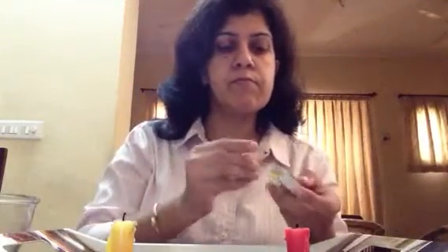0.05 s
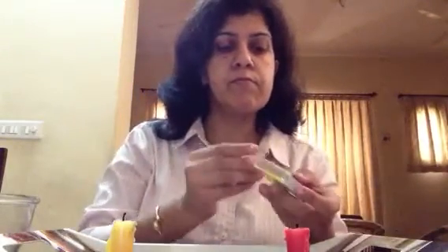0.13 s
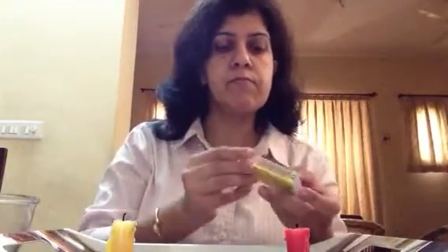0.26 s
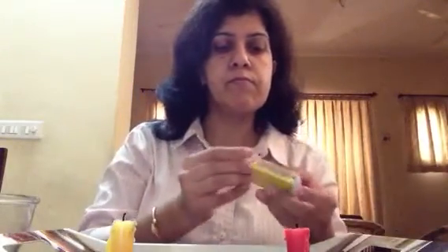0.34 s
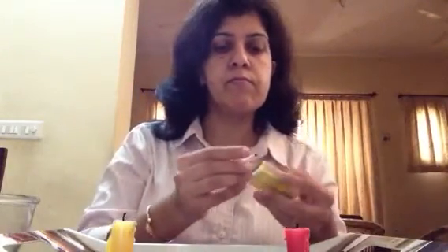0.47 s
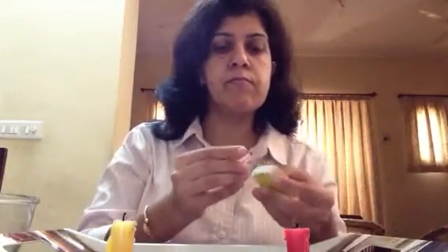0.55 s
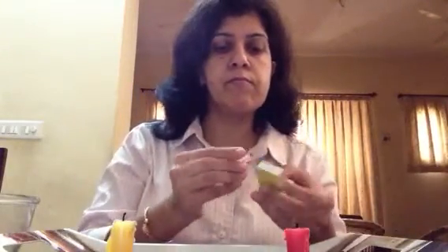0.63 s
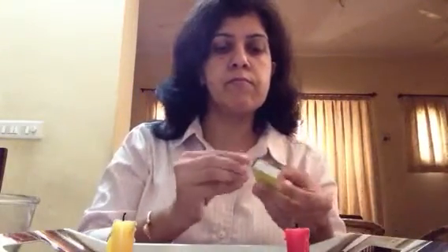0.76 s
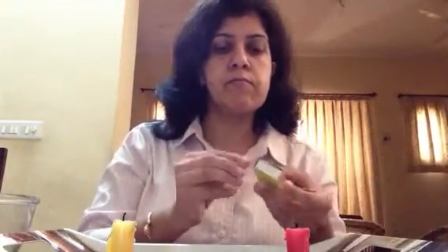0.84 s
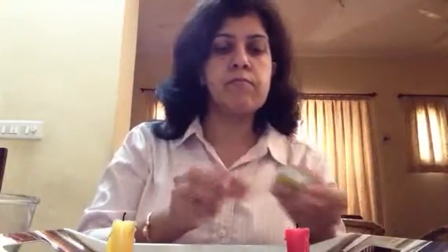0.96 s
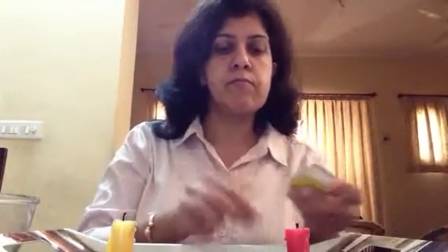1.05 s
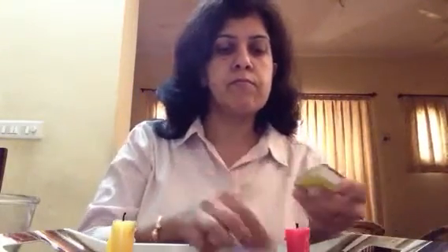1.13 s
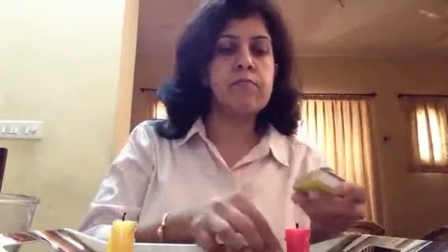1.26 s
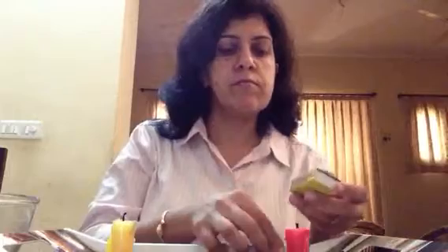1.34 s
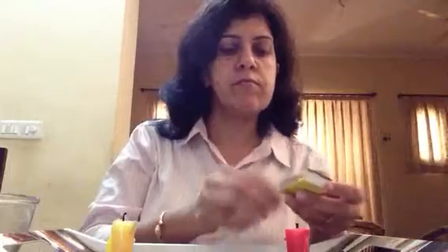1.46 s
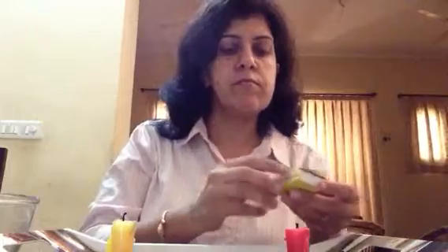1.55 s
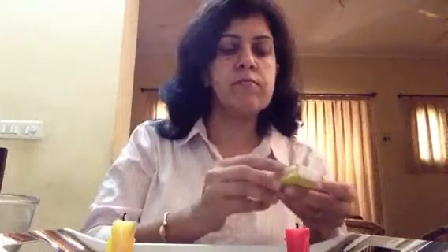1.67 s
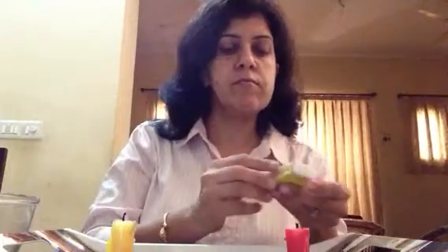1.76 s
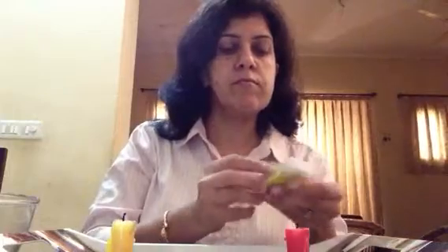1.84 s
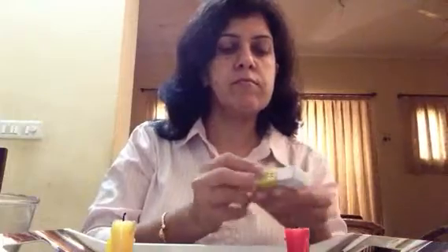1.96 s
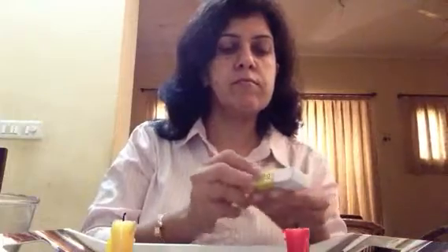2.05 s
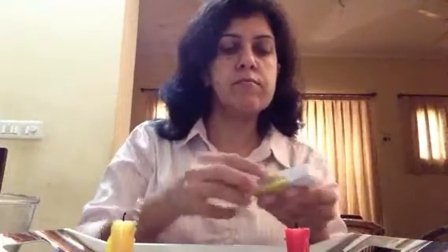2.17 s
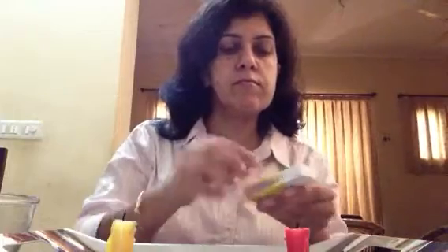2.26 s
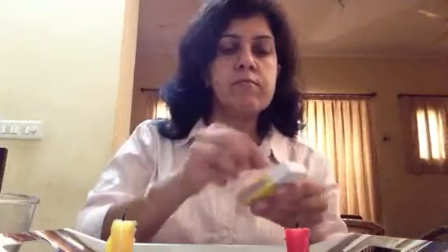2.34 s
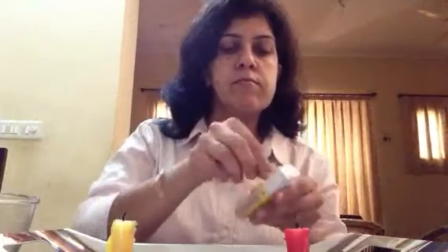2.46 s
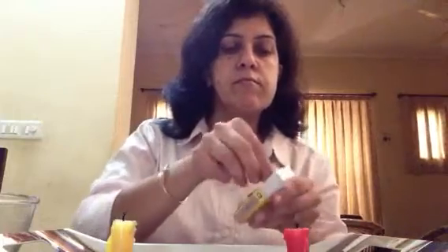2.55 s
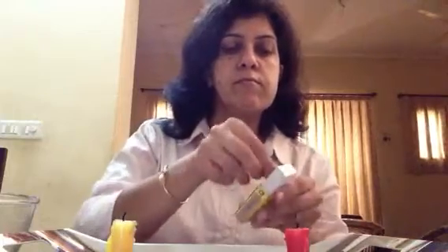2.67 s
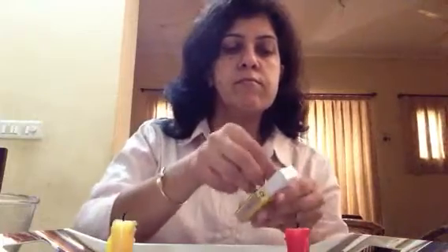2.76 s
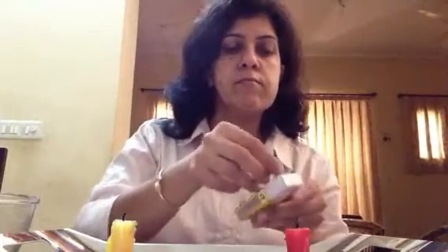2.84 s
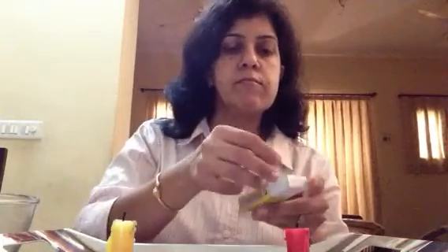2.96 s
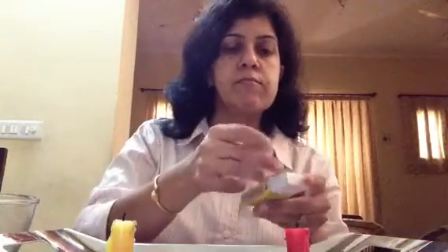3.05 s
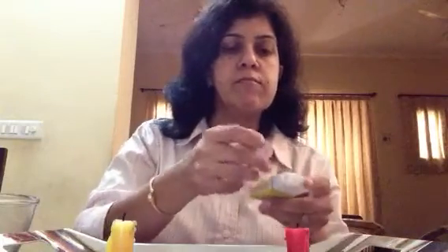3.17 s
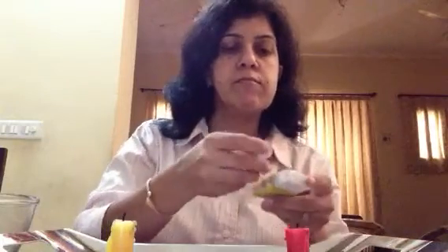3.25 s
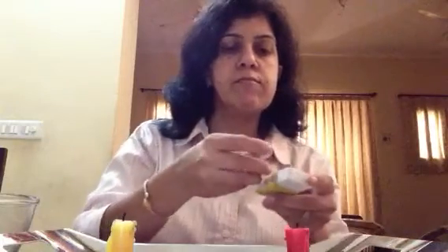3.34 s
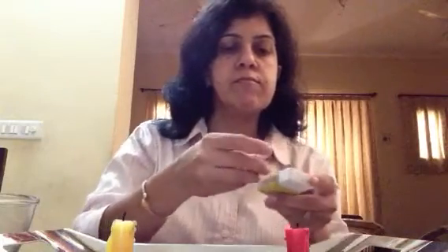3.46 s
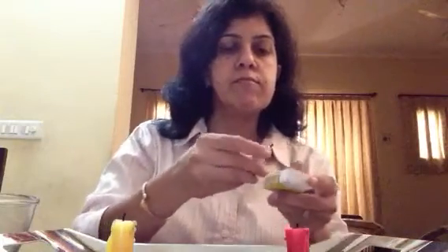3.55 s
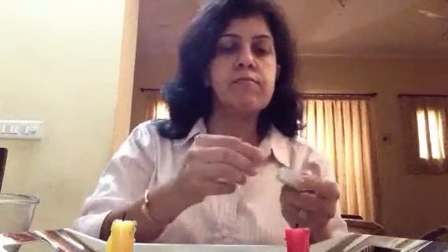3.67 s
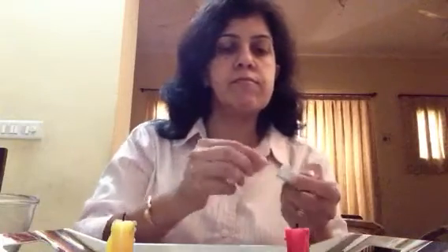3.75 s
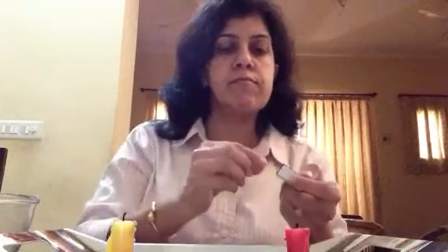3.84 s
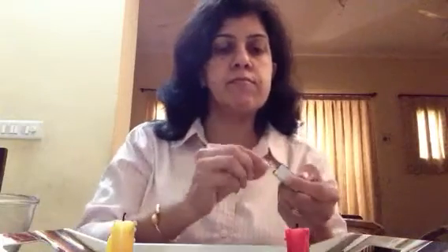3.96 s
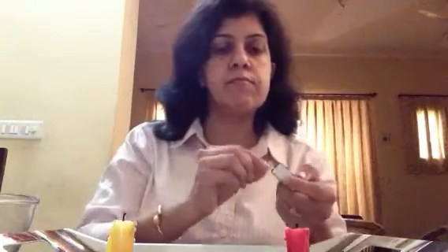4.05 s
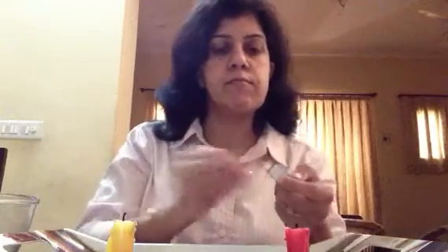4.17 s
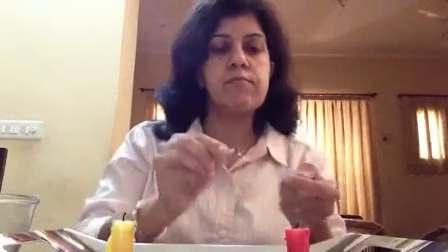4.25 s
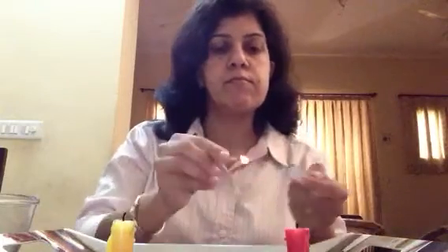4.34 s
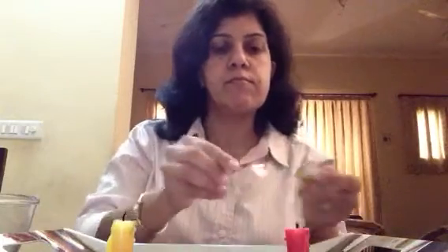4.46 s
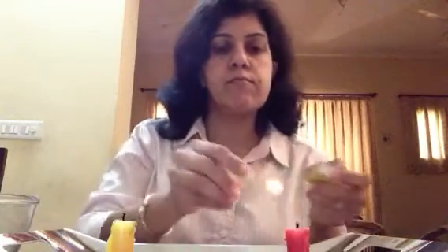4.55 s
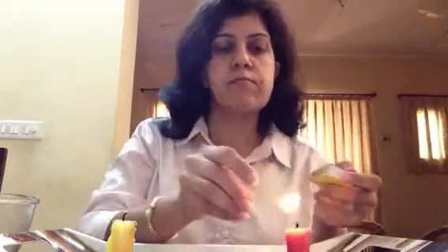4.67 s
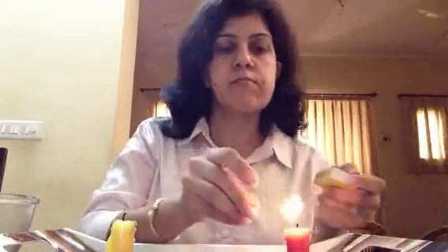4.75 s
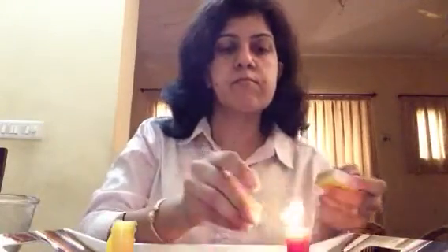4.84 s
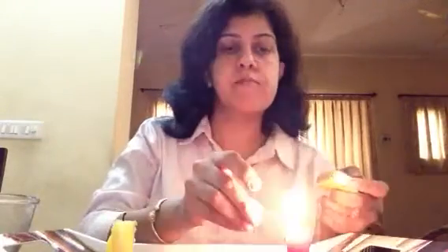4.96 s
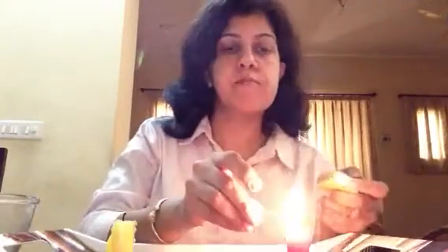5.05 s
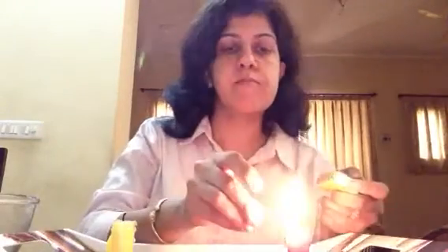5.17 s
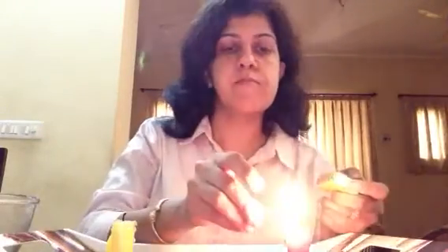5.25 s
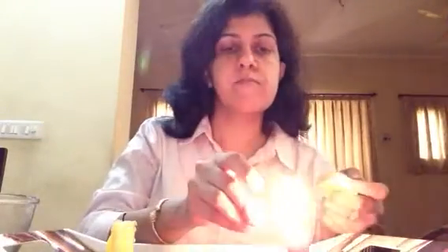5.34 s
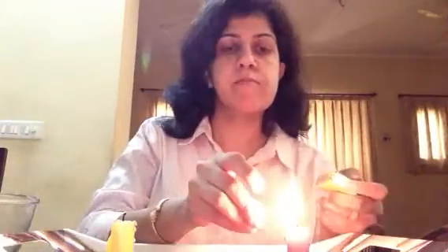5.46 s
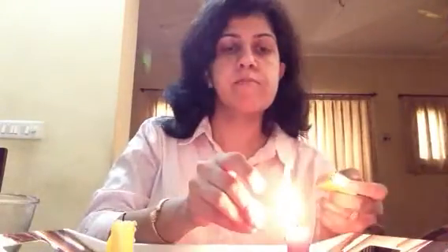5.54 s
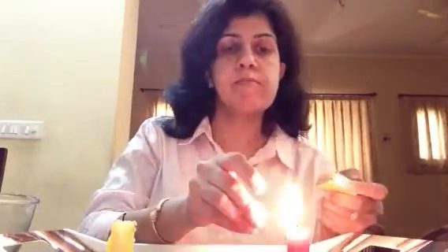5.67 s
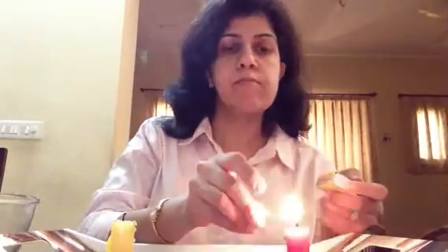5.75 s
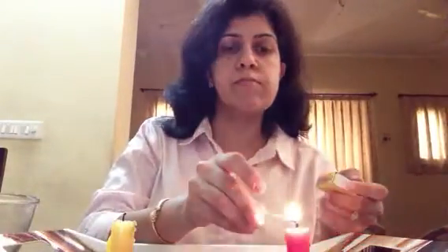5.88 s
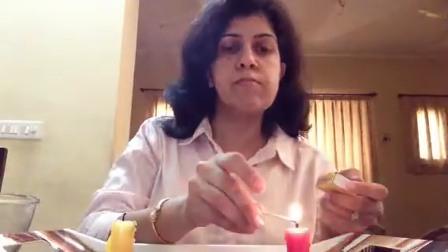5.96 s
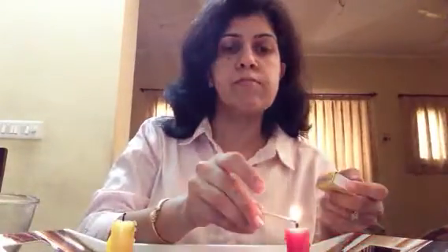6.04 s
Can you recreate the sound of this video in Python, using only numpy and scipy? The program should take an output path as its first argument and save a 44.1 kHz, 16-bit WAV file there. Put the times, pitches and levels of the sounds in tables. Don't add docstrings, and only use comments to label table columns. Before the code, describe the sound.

A washing machine in the next room swishes water to and fro beneath faint hush. Nearby, a matchbox is handled: papery scrapes, tiny hollow taps, bright snapping clicks. Then comes a tight burst of sharp cracks, a rough puff of gas, dull pops and an uneven hiss that weakens into dry spitting. A faint horn dips early on. Lightly echoing house room, small device with the highest treble cut.

```python
import sys
import numpy as np
from scipy import signal
from scipy.fft import rfft, irfft
from scipy.io import wavfile
from scipy.ndimage import uniform_filter1d

SR = 44100
rng = np.random.default_rng(int(sys.argv[2]) if len(sys.argv) > 2 else 0)


def generate_wav(sig):
    pcm = np.round(np.clip(np.atleast_2d(sig).T, -1, 1) * 32767).astype(np.int16)
    wavfile.write(sys.argv[1], SR, pcm)


def amplitude_ratio(level_db):
    exponent = np.asarray(level_db, float) / 20
    return 10 ** exponent


N = 269362
T = np.arange(N) / SR
STEPS = T[::32]

# f/Hz, width/Hz, level/dB
BOX_RINGS = [(1275, 101, -3.5), (1840, 450, 1.5), (2533, 410, -4)]
# t/s, gas level/dB
BURNING = [
    (4.2, -51),
    (4.27, -54.5),
    (4.39, -63),
    (4.56, -63),
    (4.64, -56),
    (4.82, -56.5),
    (5.2, -58),
    (5.48, -58.5),
    (5.66, -76),
]
# f/Hz, level/dB (per Hz)
GAS_HISS_COLOUR = [(2060, -32.5), (3500, -12), (6320, -7), (7160, -3), (7770, -6), (9840, -2),
                   (10700, -3.5), (14500, -1.5), (15500, -7)]


def level(x, db):
    return x * amplitude_ratio(db) / np.sqrt(np.mean(x ** 2))


def peak(x, db):
    return x * amplitude_ratio(db) / np.abs(x).max()


def band(x, hz, width_hz):
    return signal.lfilter(*signal.iirpeak(min(hz, 18000), hz / width_hz, fs=SR), x)


def coloured(x, points):
    hz, db = np.transpose(points)
    f = np.maximum(np.arange(N // 2 + 1) * SR / N, 1)
    gain = amplitude_ratio(np.interp(np.log(f), np.log(hz), db))
    return level(irfft(rfft(x) * gain, N), 0)


def noise():
    return rng.standard_normal(N)


def grit(spread_db):
    return noise() * amplitude_ratio(spread_db * np.minimum(rng.exponential(size=N), 4))


def walk(rate):
    hold = int(SR / rate)
    held = np.repeat(rng.standard_normal(N // hold + 1), hold)
    return 1.24 * uniform_filter1d(uniform_filter1d(held, hold), hold)[:N]


def curve(rows, column):
    rows = np.array(rows)
    gain = np.zeros(N)
    on = slice(int(rows[0, 0] * SR), int(rows[-1, 0] * SR))
    gain[on] = amplitude_ratio(np.interp(T[on], rows[:, 0], rows[:, column]))
    return uniform_filter1d(gain, size=200)


def swells(rows, column):
    power = 0
    for row in rows:
        rise_share = 0.86
        away = np.maximum((row[0] - STEPS) / rise_share, STEPS - row[0])
        power = power + amplitude_ratio(row[column] - 20 * away / max(row[-1], .005)) ** 2
    return np.interp(T, STEPS, np.sqrt(power))


def burst(ms, grains, rise=0.2):
    t_ms = np.arange(len(grains)) / SR * 1000
    ms = max(ms, .3)
    return grains * np.minimum(t_ms / (rise * ms), 1) * np.exp(-t_ms / ms)


def add(out, s, x):
    i = int(s * SR)
    out[i:i + len(x)] += x[:N - i]


def slosh():
    # crest t/s, level/dB, time to rise 20 dB/s, time until it settles/s
    swings = [
        (0.35, -48, 0.09, 0.3),
        (0.596, -53, .2, .12),
        (1.203, -47.5, 0.1, .4),
        (1.663, -58.5, -0.4, 0.024),
        (2.07, -48.5, 0.22, 0.56),
        (2.862, -48.5, 0.12, 0.46),
        (3.743, -50.5, 0.26, 0.58),
        (4.65, -50.5, 0.43, 0.53),
        (5.43, -46, 0.2, 0.12),
        (5.72, -54, .3, .08),
    ]
    surges = []
    for s, top_db, rise, length in swings:
        before, after = np.maximum(s - STEPS, 0), np.maximum(STEPS - s, 0)
        settling = np.maximum(STEPS - s - length, 0)
        surges.append(top_db - 20 / max(rise, .02) * before - 26.5 * after - 51 * settling)
    still_db = -67
    return np.interp(T, STEPS, amplitude_ratio(np.maximum(np.max(surges, axis=0), still_db)))


def washer():
    # f/Hz, level/dB (per Hz)
    slosh_colour = [(41, -62.5), (70, -32), (140, -7), (173, -6), (298, -1.5), (407, -6), (438, 1.5),
                    (493, -8), (827, -9), (1030, -13.5), (2400, -27.5), (3120, -56.5), (5280, -120)]
    # f/Hz, width/Hz, level/dB
    tub_rings = [(229.9, 23, -6), (303.8, 32, -4), (390.9, 11, -5), (435.4, 10, -6), (552, 14.9, -24.5),
                 (687.6, 35, -13), (822, 19, -14), (942, 34, -15.5)]
    # t/s, level/dB, rise/s, decay/s
    sprays = [
        (.27, -57.5, 0.28, 0.19),
        (1.14, -58.5, 0.014, 0.33),
        (1.97, -55.5, 0.019, 0.2),
        (2.79, -59, 0.045, 0.3),
        (3.62, -62, 0.11, 0.35),
        (4.52, -77, .05, 0.16),
        (5.36, -64, 0.037, 0.17),
    ]
    # f/Hz, level/dB (per Hz)
    spray_colour = [(1060, -32.5), (1800, -4.5), (2720, -4.5), (3150, -3), (4810, -7.5), (8250, -9.5),
                    (14400, -23), (15500, -20)]
    water = coloured(noise(), slosh_colour)
    for hz, width_hz, db in tub_rings:
        ring = band(band(noise(), hz, width_hz), hz, 4 * width_hz)
        water = water + amplitude_ratio(db + 2 * walk(6.3)) * level(ring, 0)
    turns = 0
    for s, db, rise, decay in sprays:
        fade = np.exp(-np.maximum(T - s, 0) / decay)
        turns = turns + amplitude_ratio(db) * np.clip((T - s) / rise, 0, 1) * fade
    spray = coloured(grit(spread_db=2.0), spray_colour) * amplitude_ratio(1.65 * walk(25.4))
    return slosh() * level(water, 0) + turns * spray


def motor_whine():
    # multiple of its rate, level/dB
    tones = [(5, -86), (6, -81.5), (7, -87.5), (9, -89.5)]
    motor_hz = 302
    turn = 2 * np.pi * np.cumsum(motor_hz * (1 + 0.00085 * walk(4))) / SR
    return sum(amplitude_ratio(db + 2 * walk(24)) * np.sqrt(2) * np.sin(round(k) * turn) for k, db in tones)


def hush():
    # f/Hz, level/dB (per Hz)
    air_colour = [(12, -77), (20, -36), (74, -37.5), (112, -11.5), (238, -4.5), (352, -5), (439, -24),
                  (505, -15.5), (1160, -23.5), (1820, -25.5), (1980, -21.5), (2150, -28), (15500, -31.5)]
    return amplitude_ratio(-63) * coloured(noise(), air_colour) * amplitude_ratio(.5 * walk(3.08))


def rubbing():
    # firmest t/s, hiss level/dB, box body level/dB, time to fade 20 dB/s
    strokes = [(.08, -82, -70, 0.1), (.134, -81, -78, 1.1), (.258, -62.5, -67, 0.02),
               (.356, -59, -58, 0.13), (.575, -71, -72, 0.15), (.63, -65, -62.5, 0.05),
               (.655, -65, -66, .04), (.685, -66, -61.5, 0.03), (.74, -73, -66, 0), (1.55, -80, -75.5, 2.5),
               (1.69, -68, -75, .04), (1.71, -63, -62, 0.08), (1.726, -61, -65, .04), (1.76, -69, -70, 0.1),
               (1.862, -59.5, -63, 0.02), (1.96, -56.5, -56.5, 0.07), (2.016, -54.5, -56, 0.08),
               (2.165, -62.5, -57.5, 0.12), (1.908, -56, -52, .008), (1.912, -48, -50, .012),
               (1.92, -65, -69, 0.05), (2.461, -55, -61, -0.05), (2.492, -65, -53, 0.05),
               (2.5, -63, -55.5, 0.1), (2.547, -60, -56, 0.05), (2.57, -63, -59.5, .1),
               (2.64, -63, -60, 0.05), (2.7, -69, -56, 0.08), (2.755, -64, -56.5, 0.08),
               (2.839, -60, -58.5, 0.13), (3.055, -67.5, -60, 0.15), (3.123, -58, -64, -0.01),
               (3.18, -62, -58, 0.01), (3.43, -76, -68, 0), (3.62, -59.5, -61, -0.06),
               (3.68, -64, -63.5, 0.13), (3.73, -56.5, -59.5, 0.09), (3.805, -54.5, -53, 0.05),
               (3.85, -63.5, -62.5, .1), (3.93, -68, -64.5, .1), (4.0, -75, -62, -0.04),
               (5.724, -73, -76, 0.43)]
    # f/Hz, level/dB (per Hz)
    rub_colour = [(1760, -32), (3000, -10), (5310, -0.5), (6660, -0.5), (10600, 0.5), (14700, -2.5),
                  (15500, -4.5)]
    grains = grit(spread_db=2.5) * amplitude_ratio(1.7 * walk(140))
    body = level(sum(amplitude_ratio(db) * band(grains, hz, w) for hz, w, db in BOX_RINGS), 0)
    hiss = coloured(grains, rub_colour)
    return swells(strokes, column=1) * hiss + swells(strokes, column=2) * body


def ticks():
    # t/s, crack level/dB, crack f/Hz, body level/dB
    taps = [(0.0737, -60, 9500, -57), (0.1389, -57, 9600, -52.5), (0.185, -66, 5000, -54),
            (0.222, -66, 5000, -54), (0.627, -58, 5300, -59), (0.6697, -56, 4300, -64),
            (0.7086, -51, 7100, -47.5), (0.737, -60, 7040, -55), (1.49, -44.5, 6000, -61),
            (1.5204, -54, 5150, -54), (1.5547, -48, 11600, -49.5), (1.5803, -60, 5300, -64),
            (1.6234, -61.5, 5300, -64.5), (1.865, -53, 7880, -49), (2.5428, -40.5, 7000, -43),
            (2.555, -44, 4600, -55), (2.599, -45, 8500, -59.5), (2.6405, -46, 7800, -66),
            (3.788, -52, 10000, -46), (3.811, -49, 4970, -46), (3.918, -54, 9000, -58),
            (4.003, -55, 5400, -52), (4.0265, -53, 5570, -55), (3.996, -57, 11000, -64)]
    # t/s, crack level/dB, crack f/Hz, body level/dB, body
    # f/Hz
    louder_taps = [(0.682, -60, 6500, -46, 1360), (.688, -57, 5000, -51, 1900), (.612, -64, 5000, -50, 1900),
                   (1.3695, -37, 9510, -47, 1200), (1.3743, -30, 11400, -46, 1970),
                   (1.3756, -33, 6150, -54, 1880), (1.3851, -43, 12000, -70, 1900),
                   (1.4317, -37, 5660, -53, 1200), (1.4344, -29.5, 11800, -48, 1930),
                   (1.9062, -35, 7000, -38, 2480), (1.9105, -39, 7500, -45, 2420), (1.913, -50, 7000, -42, 1820),
                   (1.925, -41, 6900, -33, 2630), (1.9275, -30, 7150, -33, 2620), (1.9308, -30, 9000, -40, 2500),
                   (1.9318, -22, 9500, -38, 2300), (1.9355, -26, 6900, -33, 2450), (1.9395, -39, 5500, -39, 2420),
                   (1.944, -44, 5470, -42, 1920), (2.4657, -32, 6900, -42, 2500), (2.4735, -37, 7800, -36, 2300),
                   (2.4772, -27, 7200, -36, 1770), (2.4787, -27.5, 5300, -38, 1600),
                   (2.4835, -34, 5400, -48, 1590), (2.673, -23.5, 10300, -39, 2780),
                   (2.6762, -19.5, 6800, -33.5, 1850), (2.6805, -36, 7090, -31, 2800),
                   (2.7417, -33, 5300, -43, 2800), (3.0172, -39, 6000, -48, 2620), (3.045, -46, 4200, -45, 2640),
                   (3.052, -49, 4000, -55, 2700), (3.062, -48, 4100, -62, 2700), (3.1775, -48, 4300, -48.5, 2480),
                   (1.7245, -51, 11000, -50, 1620), (.58, -58, 5460, -50, 1850), (4.868, -44, 4300, -35, 1150),
                   (4.873, -48, 3000, -37, 1700), (2.52, -50, 5400, -52, 2700), (2.575, -52, 7500, -52, 2600),
                   (2.695, -48, 6500, -44, 1750), (2.708, -52, 5000, -46, 2800), (3.128, -54, 4500, -58, 2600)]
    out, grains = np.zeros(N), level(grit(spread_db=3.5), 0)
    hits = [(*row, 1840, 3.2) for row in taps] + [(*row, 2.2) for row in louder_taps]
    for s, crack_db, crack_hz, body_db, body_hz, ms in hits:
        rattle = burst(ms, grains[int(s * SR):][:1500])
        hit = rattle + 10 / ms * signal.unit_impulse(1500, idx=30)
        crack = band(band(hit, crack_hz, .3 * crack_hz), crack_hz, .9 * crack_hz)
        crack = crack + .35 * band(band(hit, 7400, 12000), 7400, 12000)
        hollow = sum(amplitude_ratio(db) * band(hit, hz, w) for hz, w, db in BOX_RINGS)
        ring = band(hit, body_hz, .11 * body_hz) + .4 * hollow
        body = band(ring, body_hz, body_hz)
        add(out, s - .0005, peak(crack, crack_db) + peak(body, body_db))
    return out


def horn():
    # t/s, f/Hz, level/dB
    glide = [
        (1.28, 1084, -84.5),
        (1.5, 1060, -73),
        (1.7, 1047, -73),
        (1.88, 1030, -71),
        (1.93, 1045, -82),
    ]
    hz = np.interp(T, *np.transpose(glide)[:2])
    tone = np.sqrt(2) * np.sin(2 * np.pi * np.cumsum(hz) / SR)
    return curve(glide, 2) * amplitude_ratio(1.6 * walk(14.8)) * tone


def knocks():
    # t/s, peak level/dB, treble slope/dB per octave
    taps = [
        (2.4352, -36, 1),
        (2.478, -42, -5),
        (2.677, -41, -5),
        (2.7415, -37, 1),
        (4.8686, -29, 0),
        (4.8716, -30, 0),
        (4.8765, -35, -4),
    ]
    # f/Hz, level/dB, time to fade 60 dB/s
    tones = [(596, -5, .03), (950, -3, .025), (1124, -1, .05), (1354, -2, .03), (2000, -4, .012),
             (2780, -1, .018), (3830, -4, .008), (5060, -3, .01)]
    out, t = np.zeros(N), T[:SR // 10]
    for s, peak_db, slope in taps:
        rings = np.zeros(len(t))
        for hz, db, t60 in tones:
            tone_db = db + slope * np.log2(hz / 1000) + 2 * rng.standard_normal()
            rings += amplitude_ratio(tone_db - 60 * t / t60) * np.sin(2 * np.pi * hz * t)
        add(out, s, peak(rings, peak_db))
    return out


def strike():
    moments = [4.17642, 4.1779, 4.17934, 4.18005, 4.18275, 4.1842]
    # peak level/dB, ring f/Hz, thump level/dB, sign of the pulse
    blasts = [
        (-8, 12500, -19, 1),
        (-16, 13000, -32, 1),
        (.5, 11500, -20, 1),
        (-8, 10500, -30, -1),
        (-9.5, 11000, -26, 1),
        (-16, 12000, -29, -1),
    ]
    # f/Hz, width/Hz, level/dB
    thump_rings = [(300, 111, -14.5), (624, 71, -18), (983, 85, -6), (1263, 18, -12.5), (1370, 50, -9),
                   (2800, 550, -9), (1750, 245, 3), (1480, 990, -7), (4570, 210, -5)]
    out = np.zeros(N)
    for s, (db, hz, thump_db, sign) in zip(moments, blasts):
        chatter = burst(.8, rng.standard_normal(6000))
        hit = sign * signal.unit_impulse(6000) + .14 * chatter
        crack = band(hit, hz, .55 * hz) + .15 * hit
        thump = sum(amplitude_ratio(g_db) * level(band(hit, f_hz, w), 0) for f_hz, w, g_db in thump_rings)
        add(out, s, peak(crack, db) + peak(thump, thump_db))
    return out


def rush():
    # start t/s, level/dB, decay/s
    puff = (4.181, -37, 0.042)
    # f/Hz, level/dB (per Hz)
    puff_colour = [(290, -49.5), (500, -18.5), (754, -20.5), (1300, -3), (1910, -8.5), (2110, -14.5),
                   (2750, -7), (5290, -15), (9000, -14.5), (11700, -40), (19800, -120)]
    s, db, decay = puff
    gas = coloured(grit(spread_db=2.5), puff_colour) * amplitude_ratio(db + 2.8 * walk(120))
    return gas * (T > s) * np.exp(-np.maximum(T - s, 0) / decay)


def follow(db, slope):
    full_burn_db = -56.5
    return amplitude_ratio(db) * (np.abs(curve(BURNING, 1)) / amplitude_ratio(full_burn_db)) ** slope


def flame():
    # t/s, hiss level/dB, time to fade 20 dB/s
    jets = [
        (4.203, -47, -0.03),
        (4.25, -52, 0.03),
        (4.31, -56.5, 0.01),
        (4.445, -50, -0.08),
        (4.475, -58.5, 0.2),
        (4.522, -52, 0),
        (4.574, -51, -0.07),
        (5.315, -51, -0.1),
        (5.568, -68, 0.1),
        (5.622, -69.5, 0.16),
    ]
    # f/Hz, width/Hz, level/dB
    roar_rings = [(635, 150, 0), (950, 120, 0), (1350, 270, -9), (1850, 110, 0), (2200, 500, -7),
                  (2550, 300, -3.5), (2920, 400, -4), (3600, 1100, -9), (4600, 360, -9)]
    flutter = amplitude_ratio(2.0 * walk(40))
    gas, spurts = curve(BURNING, 1), swells(jets, column=1)
    hiss = coloured(grit(spread_db=4.0), GAS_HISS_COLOUR)
    low = signal.sosfiltfilt(signal.butter(4, 11200, fs=SR, output="sos"), hiss)
    grains, roar = grit(spread_db=4.5), 0
    for k, (hz, width_hz, db) in enumerate(roar_rings):
        ring = band(np.roll(grains, 5000 * k), hz, width_hz)
        roar = roar + amplitude_ratio(db + 1.5 * walk(20)) * level(ring, 0)
    low_part = np.hypot(gas, spurts) * level(low, 0)
    top_part = np.hypot(follow(db=-57, slope=1.6), .6 * spurts) * level(hiss - low, 0)
    return flutter * (low_part + top_part + follow(db=-57.5, slope=0.69) * level(roar, 0))


def rumble():
    air = band(band(noise(), 218, 110), 218, 218)
    return follow(db=-65.5, slope=0.69) * level(air, 0)


def pops():
    # t/s, peak level/dB, f/Hz
    puffs = [
        (4.203, -34, 1500),
        (4.2169, -30.5, 1340),
        (4.249, -36.5, 1350),
        (4.272, -36.5, 1380),
        (4.2915, -39, 2800),
        (4.316, -38, 1780),
        (4.3412, -42.5, 704),
        (4.3422, -44, 1470),
    ]
    out = np.zeros(N)
    for s, db, hz in puffs:
        pulse = band(signal.unit_impulse(900), hz, .25 * hz)
        add(out, s, peak(band(pulse, hz, hz), db))
    return out


def sputters():
    # t/s, peak level/dB, f/Hz
    wet = [(4.6104, -49, 1810), (4.698, -47, 2960), (4.7501, -47, 2550), (4.7714, -44, 1780),
           (4.8204, -47, 2650), (4.91, -40, 1890), (5.0923, -44, 1890), (5.123, -45, 1890),
           (5.1584, -50, 1830), (5.1736, -43, 1830), (5.254, -45.5, 1890), (5.2949, -44, 1780),
           (5.3587, -51, 1870), (5.3906, -42.5, 1800), (5.4385, -48, 1800), (5.468, -45, 1840),
           (5.4804, -48, 2750), (5.5194, -58, 1710), (5.5674, -47, 1890), (5.6064, -54, 3200),
           (5.6101, -51, 2550), (5.6224, -54, 1790), (5.7204, -61, 1900), (5.7813, -56, 2830),
           (5.8047, -58, 1880)]
    # t/s, peak level/dB
    dry_spits = [(5.0454, -37), (5.3576, -42), (5.3924, -36), (5.4074, -45), (5.44, -35.5), (5.4738, -38.5),
                 (5.481, -43), (5.5383, -42.5), (5.567, -38), (5.5717, -42), (5.6067, -42), (5.624, -35.5),
                 (5.6374, -48), (5.646, -46), (5.6694, -54), (5.7164, -50), (5.7224, -58), (5.7474, -58),
                 (5.7817, -47), (5.8056, -48)]
    out, ms = np.zeros(N), 3.3
    hiss, grains = coloured(grit(spread_db=4.0), GAS_HISS_COLOUR), grit(spread_db=4.5)
    for s, db, hz in wet:
        spit = burst(ms, grains[int(s * SR):][:1500])
        add(out, s - .001, peak(band(spit, hz, .3 * hz), db - 0.5))
    for s, db in dry_spits:
        spit = burst(ms, hiss[int(s * SR):][:1500])
        add(out, s - .001, peak(spit, db - 0.5))
    return out


def room(x):
    # f/Hz, time to fade 60 dB/s, level/dB
    echo_bands = [(680, 0.14, -15), (1770, 0.19, -14), (3680, 0.65, -13.5), (7100, 0.11, -17.5),
                  (12560, 0.099, -13)]
    t, tail = T[:SR // 2], 0
    for hz, t60, db in echo_bands:
        fading = band(rng.standard_normal(len(t)), hz, hz) * amplitude_ratio(-60 * t / t60)
        tail = tail + amplitude_ratio(db) * level(fading, 0)
    echoes = tail * np.clip(t / 0.0013, 0, 1) / np.sqrt(len(t))
    table_ms = 0.4
    echoes[int(table_ms * SR / 1000)] += 0.071
    return x + signal.fftconvolve(x, echoes)[:N]


def scene():
    near = rubbing() + ticks() + knocks() + strike() + rush() + flame() + pops() + sputters()
    near = signal.sosfilt(signal.butter(3, 220, "high", fs=SR, output="sos"), near)
    return (room(near) + washer() + motor_whine() + hush() + horn() + rumble())[None]


def top_cut(x):
    return signal.sosfilt(signal.butter(12, 16520, fs=SR, output="sos"), x)


def record(dry):
    top_hz = 15380
    mix = signal.sosfilt(signal.ellip(8, .2, 39, top_hz, fs=SR, output="sos"), dry)
    return top_cut(mix)


dry = scene()
out = record(dry)
generate_wav(out)
```